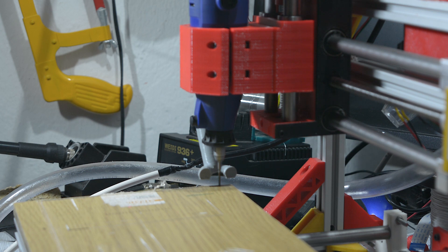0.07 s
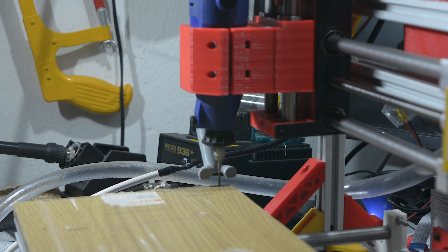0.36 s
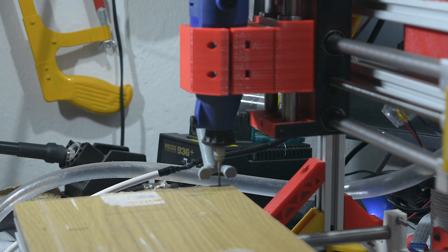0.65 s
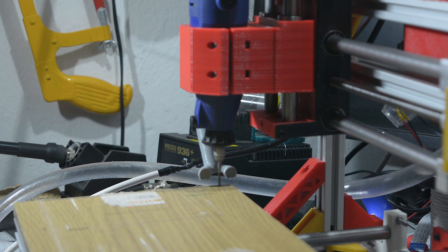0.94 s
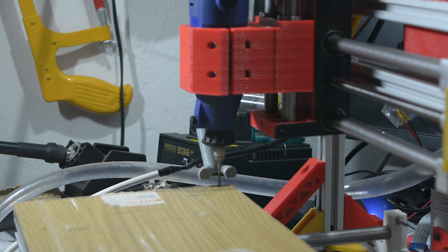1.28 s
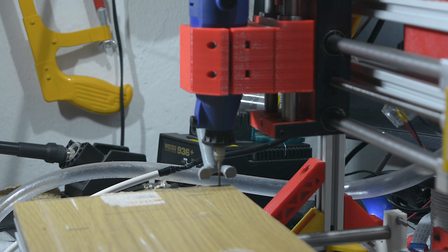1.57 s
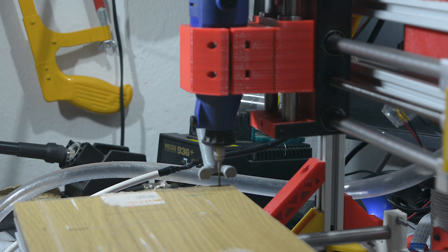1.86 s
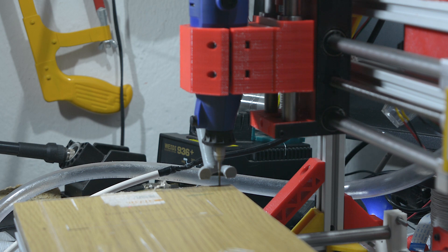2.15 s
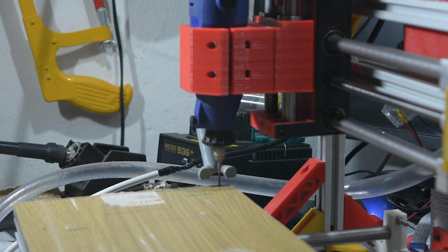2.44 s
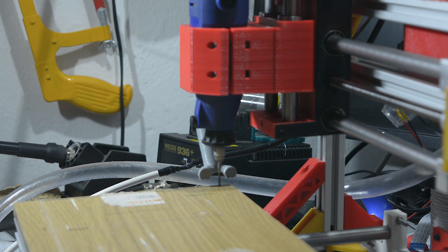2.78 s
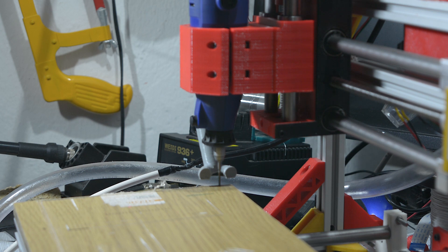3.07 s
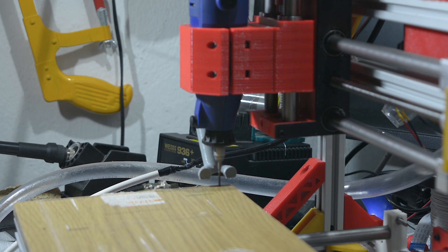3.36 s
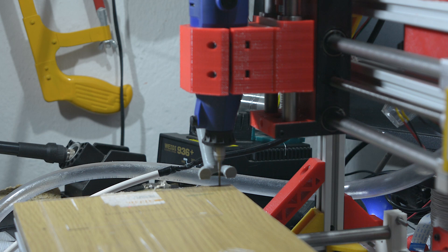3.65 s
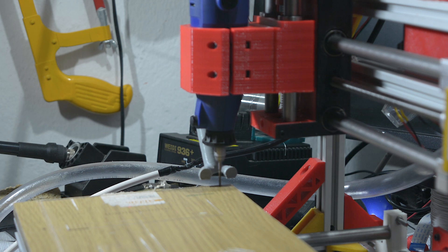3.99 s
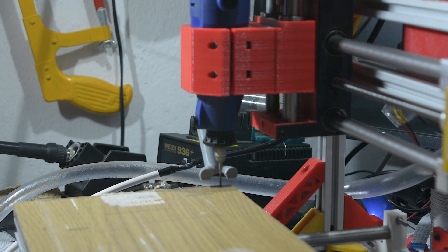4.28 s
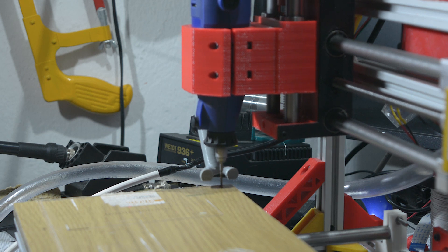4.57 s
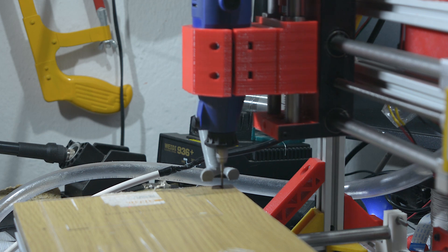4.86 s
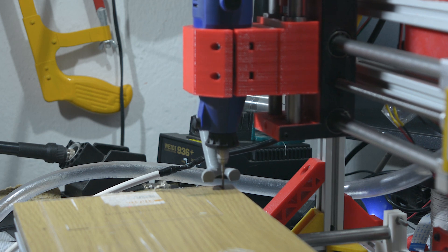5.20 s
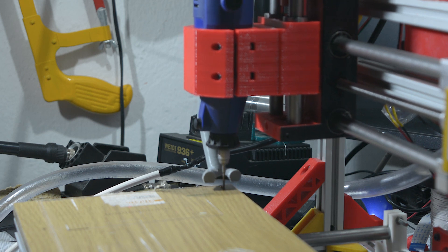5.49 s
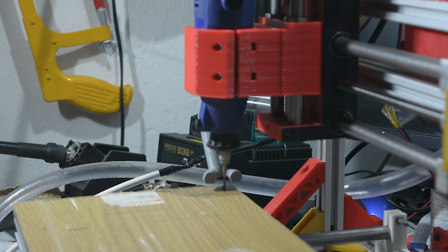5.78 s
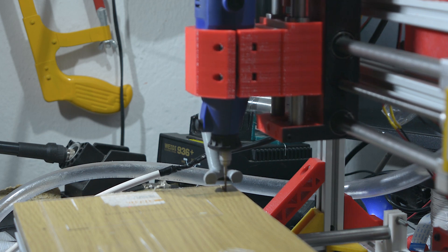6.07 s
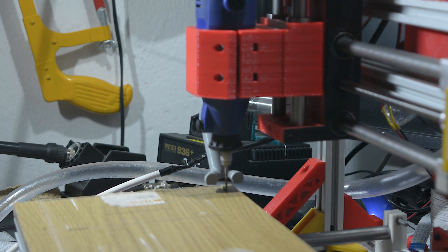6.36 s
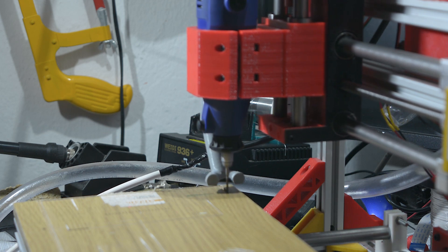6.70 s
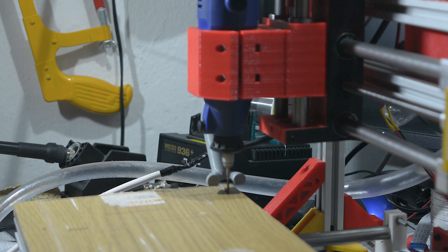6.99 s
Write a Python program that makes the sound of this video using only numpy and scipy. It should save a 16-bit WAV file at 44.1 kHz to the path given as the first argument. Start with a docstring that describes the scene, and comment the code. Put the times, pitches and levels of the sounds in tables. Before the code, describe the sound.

From the start, the rotary tool of a small milling machine spins freely with a steady, high whine. Its cooling fan adds an airy rush and a thin whistle that softens after the first second, with a faint hum underneath. A soft, low scuff passes at about 0.8 seconds. At about 3.7 seconds the bit touches a wooden board with a short squeal and a high rasp. The sound grows louder and rougher, and is strongest from about 4.2 to 5 seconds as the bit sinks in. The pitch slides down clearly from 4 seconds, then more slowly, levelling out lower near 6.5 seconds. A lighter rasp comes in around 4.8 seconds, and the cutting eases briefly near 5.3 seconds. The tool then keeps cutting with an uneven, buzzing chatter and a hiss of tearing wood until the end, just after 7 seconds.

```python
"""A workshop: the rotary tool of a small CNC machine spins freely at 500 turns a second, then its bit
is fed into a wooden board. The frame hums underneath, the cooling fan rushes and whistles, and shaft
and ball bearing whine on top. The bit squeals as it grazes the wood; under load the speed sags,
and the bit chatters once a turn and tears off chips."""
import sys
import numpy as np
from scipy import signal
from scipy.fft import rfft, irfft, next_fast_len
from scipy.io import wavfile
from scipy.ndimage import map_coordinates

SR = 44100
rng = np.random.default_rng(int(sys.argv[2]) if len(sys.argv) > 2 else 0)


def waveform_to_disk(signal):
    """Save audio, clipped to [-1, 1], as 16-bit WAV at the path in sys.argv[1]."""
    frames = np.transpose(np.atleast_2d(signal))
    scaled = np.clip(frames, -1, 1) * 32767
    samples = np.round(scaled).astype(np.int16)
    wavfile.write(sys.argv[1], SR, samples)


N = 319284
TIME_S = np.arange(N) / SR
TOUCH_S, LOAD_RISE_S, FULL_LOAD = 3.68, 0.24, 0.9  # the bit meets the wood and load builds from 0


def amp(db):
    """Decibels to gain."""
    return 10 ** (np.asarray(db) / 20)


def unit(x):
    """Scale to rms 1."""
    return x / np.sqrt(np.mean(x ** 2) + 1e-20)


def automation(points):
    """A value for each sample, ramping between (time_s, value) points."""
    return np.interp(TIME_S, *np.transpose(points))


def wobble(rate):
    """A smooth random curve, rate knots a second."""
    coarse = np.linspace(0, N, 4096)
    knots = rng.standard_normal(4096)
    curve = map_coordinates(knots, [coarse * rate / SR], mode="wrap")
    return np.interp(np.arange(N), coarse, curve)


def held(start_s, length_s, attack_s=0.14, release_s=0.17):
    """An envelope that rises, holds until length_s has passed, then dies away."""
    age_s = TIME_S - start_s
    return np.clip(age_s / attack_s, 0, 1) * np.exp(-np.maximum(age_s - length_s, 0) / release_s)


def bumps(rows, x):
    """Sum of bell-shaped (centre, width, height) peaks and dips at x."""
    return sum(height * np.exp(-((x - centre) / width) ** 2 / 2) for centre, width, height in rows)


def eq_gain(points, hz):
    """Gain of an EQ curve of (freq_hz, level_db) points on a log frequency axis."""
    freq_hz, level_db = np.transpose(points)
    return amp(np.interp(np.log(hz + 1), np.log(freq_hz + 1), level_db))


def filtered(x, response):
    """Filter x by a gain given as a function of frequency."""
    size = next_fast_len(N + SR // 4)
    return irfft(rfft(x, size) * response(np.fft.rfftfreq(size, 1 / SR)), size)[..., :N]


def eq(x, points):
    """Play x through an EQ curve."""
    return filtered(x, lambda hz: eq_gain(points, hz))


def reflected(x, strength):
    """Ten early reflections from board, frame and wall give a fixed, jagged colour."""
    taps = np.zeros(SR // 20)
    taps[rng.integers(SR // 1000, SR // 40, size=10)] = strength * rng.choice([-1, 1], size=10)
    taps[0] = 1
    return signal.fftconvolve(x, taps / np.linalg.norm(taps))[:N]


def rush(spectrum):
    """Coloured noise of rms 1, rippled by reflections."""
    noise = reflected(rng.standard_normal(N), strength=0.14)
    return unit(eq(noise, spectrum))


def tone(angle, flutter, rate):
    """A partial of rms near 1 whose level and phase flutter at random."""
    carrier = (1 + flutter * wobble(rate)) * np.cos(angle)
    phase_jitter = flutter * wobble(rate) * np.sin(angle)
    return np.sqrt(2 / (1 + 2 * flutter ** 2)) * (carrier + phase_jitter)


# Hum bed of the frame and its stepper motors: pitch_hz, level_db
FRAME_HUM = [(100, -77.5), (156, -74), (199.5, -61), (264, -68.5), (399, -67.5), (528, -58.5), (673, -62),
             (801, -54.5), (1100, -51.5)]
# A short, low scuff: centre_s, width_s, level_db
FRAME_SCUFF = [(0.808, 0.051, -43.5)]


def frame():
    """The frame hums at fixed pitches and gives one soft scuff."""
    hum = sum(amp(db) * tone(2 * np.pi * hz * TIME_S, flutter=0.23, rate=18) for hz, db in FRAME_HUM)
    swell = bumps([(centre_s, width_s, amp(db)) for centre_s, width_s, db in FRAME_SCUFF], TIME_S)
    return hum + swell * rush([(300, -52), (540, -16), (700, 4), (820, -3), (1200, -40)])


# Colour of the cooling air: freq_hz, relative_db
AIR_EQ = [(25, -38), (60, -47), (130, -26.5), (210, -17), (290, -17.5), (370, -19.5), (550, -10.5),
          (850, -8.5), (1200, -2.5), (1700, 1.5), (2400, -4), (3100, -7.5), (5500, -9), (9000, -7.5),
          (10700, -10.5), (12500, -19.5), (15000, -29)]


def fan_air(angle):
    """Cooling air rushes out, pulsing slightly with each turn."""
    return amp(-35.0 + 0.054 * wobble(12.0)) * rush(AIR_EQ) * (1 + 0.025 * np.cos(angle))


# Fader ride of the fan's whistle: time_s, level_db
WHISTLE_FADER = [(0, -39.5), (.6, -40.5), (1.2, -47), (2.4, -52), (3.6, -45), (3.95, -43), (4.5, -51),
                 (7.24, -48)]


def fan_whistle(angle, blades=18):
    """The fan blades whistle as they pass the vents."""
    return amp(automation(WHISTLE_FADER)) * tone(blades * angle, flutter=0.2, rate=29)


def whine(partials, angle, load, free_flutter, cut_flutter, swell_db, rate):
    """Partials tied to the shaft; side load on the bit shifts their balance and unsettles them."""
    free = np.clip(1 - 1.05 * load * load, 0, 1)
    flutter = free_flutter + (cut_flutter - free_flutter) * np.clip(load, 0, 1)
    running, cutting = np.zeros((2, N))
    for multiple, free_db, cut_db in partials:
        partial = tone(multiple * angle + rng.uniform(0, 2 * np.pi), flutter, rate)
        running += amp(free_db) * partial
        cutting += amp(cut_db + swell_db * wobble(12)) * partial
    # the sagging partials flare and fade as they slide through the peaks of the reflections
    return free * running + (1 - free) * load * reflected(cutting, strength=0.21)


# Ball passes and their sidebands: shaft_multiple, free_db, cutting_db
BEARING_PARTIALS = [(1.653, -68, -55), (2.653, -71, -46), (3.347, -48.5, -56), (3.653, -68, -42.5),
                    (4.653, -45, -43.5), (5.306, -49, -46.5), (5.653, -56, -43.5), (5.959, -57.5, -40),
                    (6.306, -53, -53), (6.612, -57, -60), (6.653, -56, -49), (7.347, -61, -65),
                    (7.53, -49.5, -64), (7.653, -54, -45), (7.77, -58, -45), (7.959, -39.5, -59),
                    (8.306, -45.5, -54), (8.653, -64, -48), (9.306, -57, -46), (10.306, -56, -63),
                    (10.653, -53.5, -58), (11.306, -55.5, -54)]


def bearing_whine(angle, load):
    """The rolling balls sing between the shaft's harmonics, steady when free and rough under load."""
    return whine(BEARING_PARTIALS, angle, load, free_flutter=0.071, cut_flutter=0.8, swell_db=2, rate=18)


# Upper harmonics of the shaft: shaft_multiple, free_db, cutting_db
SHAFT_PARTIALS = [(8, -48, -43.5), (9, -61, -45.5), (10, -52, -49), (11, -55, -50), (12, -55, -51),
                  (13, -52, -52), (14, -53, -52), (15, -56, -53), (16, -55, -51), (17, -58, -55),
                  (19, -56, -56), (20, -63, -58), (25, -68, -68)]
# Resonances of the tool housing: centre_hz, width_hz, boost_db
HOUSING_PEAKS = [(5100, 40, 3), (6810, 45, 2), (7330, 70, 3)]


def shaft_whine(angle, load, effort_db):
    """The shaft whines through its housing; sharper knocks of the bit lift it up to about 5 kHz."""
    shaft = whine(SHAFT_PARTIALS, angle, load, free_flutter=0.16, cut_flutter=0.35, swell_db=3, rate=20)
    shaft = filtered(shaft, lambda hz: amp(bumps(HOUSING_PEAKS, hz)))
    plunge = held(start_s=4.12, length_s=0.39)  # the knocks are sharper while the tip sinks in
    sharpness_db = load * (8 * plunge + 0.28 * effort_db)
    return shaft + (amp(sharpness_db) - 1) * eq(shaft, [(4600, 3), (6500, -21)])


# Colour of the rasp: freq_hz, relative_db
RASP_EQ = [(3500, -18), (4500, -35), (5500, -5), (6300, -4.5), (7500, -3.5), (8500, -8), (10000, -11),
           (11500, -14)]
# Rasp cues, on entry and as the sideways cut begins: start_s, length_s, level_db
RASP_CUES = [(3.734, 0.37, -36), (4.797, 0.81, -43)]


def graze(angle, ball_passes_per_turn=2.653):
    """A light touch on the wood brings out the ball-pass squeal and a rasp of its high sidebands."""
    squeal_gain = amp(-36) * held(TOUCH_S, length_s=0.39)
    squeal = squeal_gain * tone(ball_passes_per_turn * angle, flutter=0.18, rate=23)
    offsets = [(order * ball_passes_per_turn) % 1 for order in range(3)]
    multiples = [harmonic + offset for harmonic in range(9, 22) for offset in offsets]
    comb = sum(tone(k * angle + rng.uniform(0, 2 * np.pi), flutter=1.0, rate=30) for k in multiples)
    rubbing = sum(amp(db) * held(start_s, length_s) for start_s, length_s, db in RASP_CUES)
    return squeal + rubbing * unit(eq(comb, RASP_EQ))


# Colour of tearing wood: freq_hz, relative_db
CHIP_EQ = [(25, -70), (100, -50), (380, -28), (600, -11), (900, -1.5), (1500, -4), (2300, -3), (3200, -0.5),
           (4500, -3), (7000, -5.5), (10000, -7), (12500, -18), (15000, -33)]


def chips(angle, load, effort_db):
    """Fibres tear in one burst a turn, unevenly as the grain changes, and more as the bit works harder."""
    bursts = unit(np.exp(0.52 * np.cos(angle)))
    return load * amp(-35.5 + 0.11 * effort_db + 1.5 * wobble(20)) * bursts * rush(CHIP_EQ)


# Vibration of tool and board, a row for each shaft harmonic from the first up: free_db, cutting_db
CHATTER_HARMONICS = [(-52.5, -43.5), (-38, -30), (-38.5, -34.5), (-51, -36.5), (-40.5, -39.5), (-59, -42),
                     (-58, -43.5)]
# Peaks and notches of board and frame: centre_hz, width_hz, gain_db
BOARD_RESONANCES = [(438, 6, 8), (461, 8, 4), (501, 4, -9), (878, 20, -3.5), (1336, 5, 6), (1384, 17, -19),
                    (1711, 6, 3), (1758, 9, 11), (1785, 15, -6), (1890, 18, 5.6), (1982, 9, 8.5),
                    (2306, 17, -20), (2421, 26, 5.6), (2609, 10, 10.5), (2795, 18, 7), (3255, 35, 3),
                    (3451, 43, -18)]
# One harmonic swells or ducks for a moment: centre_s, width_s, harmonic, gain_db
CHATTER_LURCHES = [(2.5, .35, 3, 2), (5.8, 0.038, 4, -16), (5.947, 0.032, 2, -15), (6.537, 0.038, 3, -7),
                   (6.803, 0.031, 3, -11), (7.12, 0.19, 3, 4.5)]


def chatter(angle, speed_hz, load, effort_db):
    """The bit strikes once a turn; its harmonics swell and fade as they slide over board resonances."""
    flutter = 0.079 + 0.036 * load
    free = np.clip(1 - load / FULL_LOAD, 0, 1)
    out = np.zeros(N)
    for k, (free_db, cut_db) in enumerate(CHATTER_HARMONICS, 1):
        lurches = [(s, width_s, db) for s, width_s, harmonic, db in CHATTER_LURCHES if harmonic == k]
        grain_db = 0.5 * k * wobble(24)  # the wood's grain unsettles the high harmonics most
        board_db = bumps(BOARD_RESONANCES, k * speed_hz)
        cutting = (TIME_S > TOUCH_S) * amp(cut_db + effort_db + board_db + grain_db)
        running = np.sqrt(free) * amp(free_db + wobble(1.88) / 2)
        gain = amp(bumps(lurches, TIME_S)) * np.hypot(running, cutting)
        lag = rng.uniform(0, 2 * np.pi) + 0.39 * wobble(3.03)
        out += gain * tone(k * angle - lag, flutter, rate=60)
    return out


# Stereo width of air and chips: freq_hz, side_db
NOISE_SPREAD = [(250, -70), (450, -51), (700, -48), (1400, -80), (2800, -35), (5600, -16.5), (9500, -7.5),
                (13000, -6.5)]
# Stereo width of the tones' reflections: freq_hz, side_db
TONE_SPREAD = [(250, -70), (480, -53), (950, -46), (1900, -32.5), (4000, -15.5), (9000, -20)]


def scatter(noise, tones):
    """The side signal: scattered sound arrives differently left and right, more so in the treble."""
    return eq(noise, NOISE_SPREAD) + eq(reflected(tones, strength=1), TONE_SPREAD)


# Turning speed of the shaft, sagging in the cut: time_s, speed_hz
SHAFT_SPEED = [(0, 498.7), (2.3, 500.1), (3.7, 499.7), (3.95, 496.7), (4.05, 493.6), (4.15, 489.3),
               (4.6, 462.7), (4.75, 456.1), (5.05, 447.4), (5.5, 438.7), (5.95, 432.4), (6.4, 428.9),
               (6.8, 427.4), (7.24, 426.9)]
# How hard the bit works as it grazes, plunges, eases off, then travels sideways: time_s, effort_db
BIT_EFFORT = [(3.67, -15), (3.85, -2), (4.13, -1), (4.2, 4.5), (4.53, 5.5), (4.95, 5), (5.29, -6),
              (5.37, -1), (5.92, -2.5), (6.05, 0.6), (6.79, -0.4), (7.24, 0.5)]


def scene():
    """One shaft angle drives every spindle layer, over the hum of the frame."""
    load = FULL_LOAD * (1 - np.exp(-np.maximum(TIME_S - TOUCH_S, 0) / LOAD_RISE_S))
    effort_db = automation(BIT_EFFORT)
    speed_hz = automation(SHAFT_SPEED) + (0.074 + 0.12 * load) * wobble(14)
    angle = 2 * np.pi * np.cumsum(speed_hz) / SR
    spindle = shaft_whine(angle, load, effort_db) + bearing_whine(angle, load)
    bit = chatter(angle, speed_hz, load, effort_db) + graze(angle)
    tones = spindle + bit + fan_whistle(angle) + frame()
    mid = tones + fan_air(angle) + chips(angle, load, effort_db)
    side_noise = fan_air(angle) + chips(angle, load, effort_db)  # fresh noise, independent of the mid
    side = scatter(side_noise, tones)
    return np.array([mid + side, mid - side])


def record(dry, top_hz=15250):
    """Master EQ: thin out the deep bass and cut everything above top_hz."""
    return filtered(dry, lambda hz: eq_gain([(25, -9), (55, -4), (85, 0)], hz) * (hz < top_hz))


dry = scene()
out = record(dry)
waveform_to_disk(out)
```